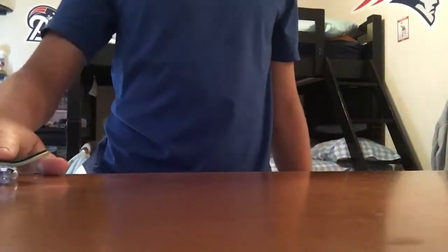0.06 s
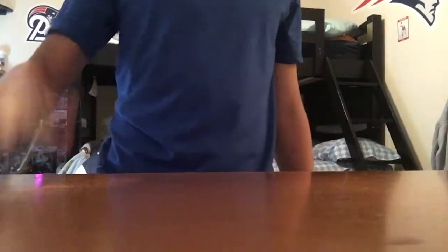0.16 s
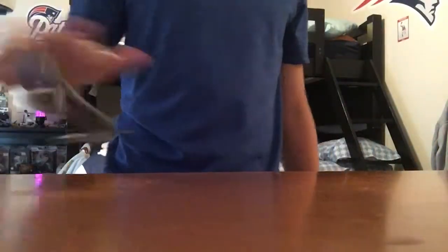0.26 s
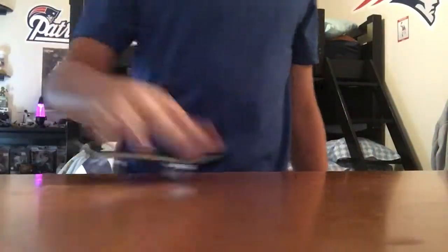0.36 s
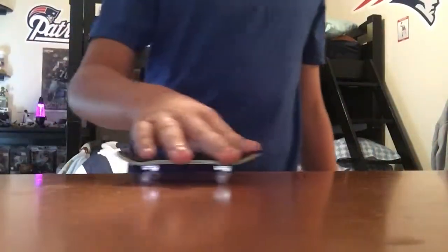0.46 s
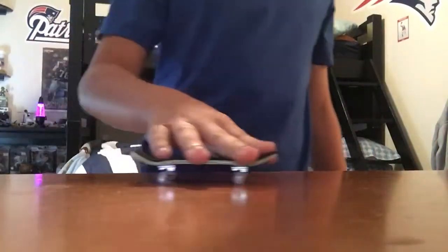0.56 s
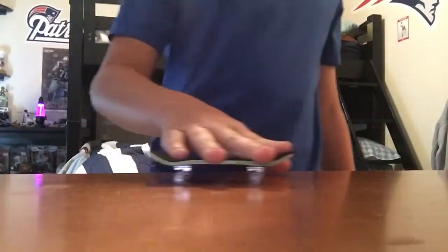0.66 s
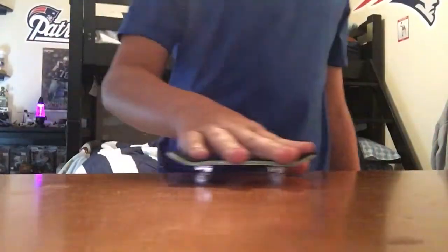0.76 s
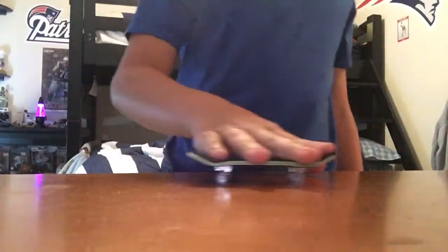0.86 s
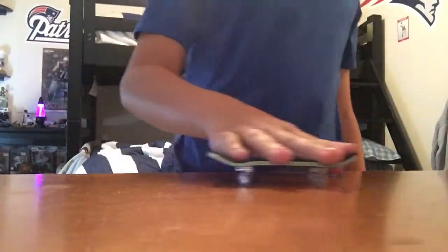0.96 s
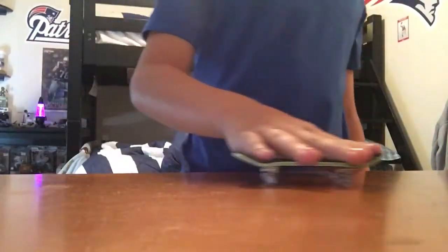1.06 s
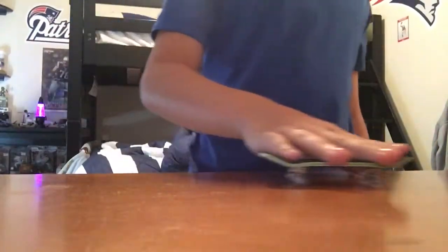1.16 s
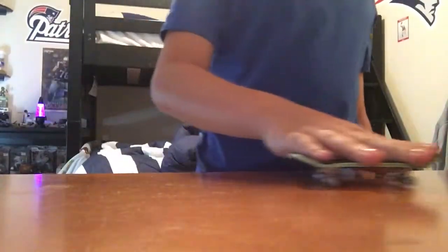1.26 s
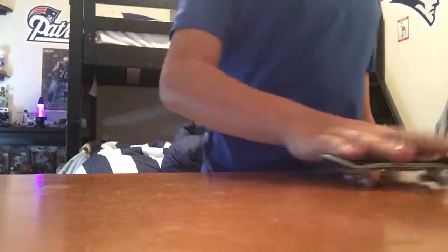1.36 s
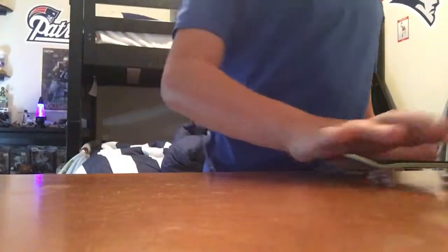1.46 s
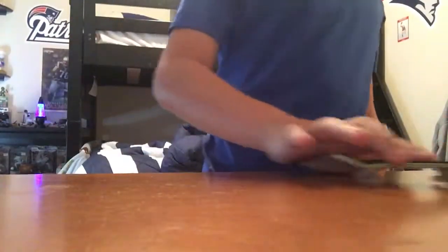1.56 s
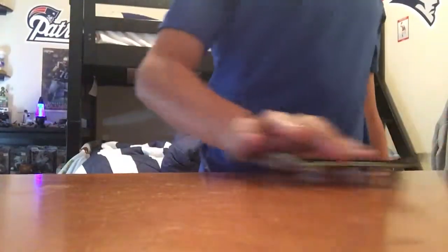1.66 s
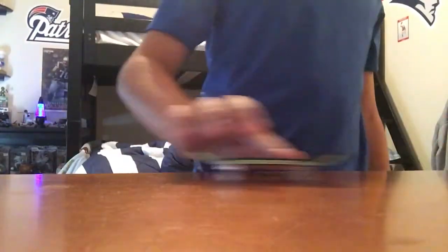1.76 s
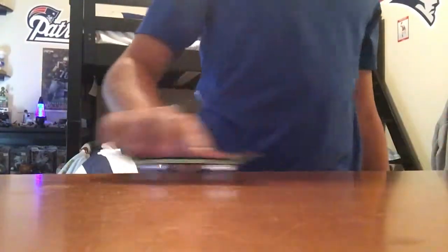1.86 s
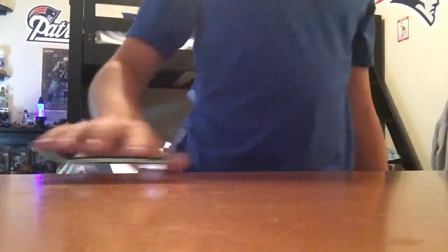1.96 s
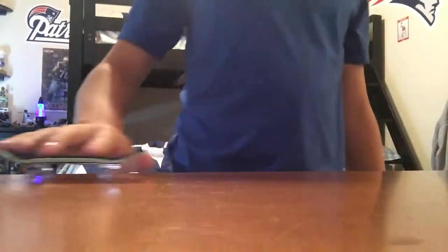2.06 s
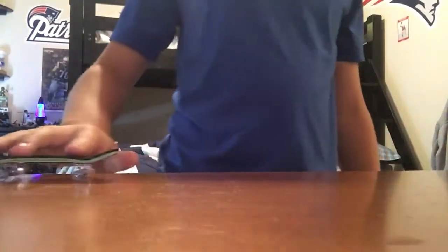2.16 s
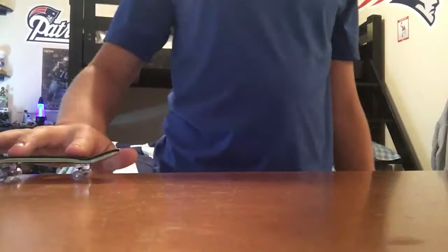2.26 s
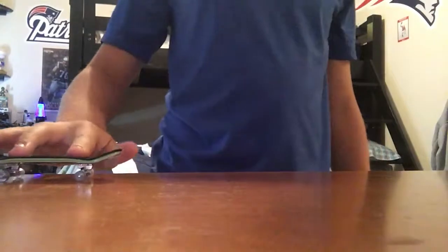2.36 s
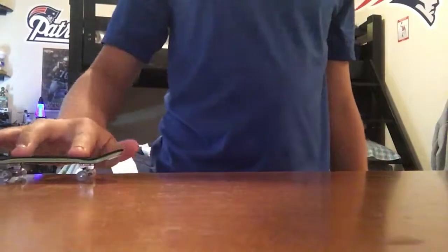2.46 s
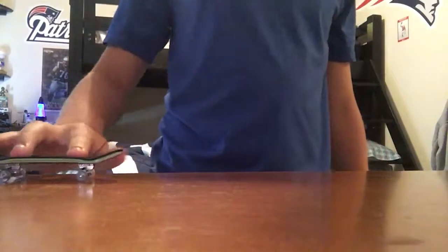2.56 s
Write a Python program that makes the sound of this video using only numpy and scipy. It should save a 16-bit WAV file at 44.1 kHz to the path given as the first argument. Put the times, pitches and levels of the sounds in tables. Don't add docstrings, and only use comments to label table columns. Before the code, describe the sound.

Tiny skateboard on a wood desk: brief scrape, hard snap, dense landing clacks, low gritty rolling, loose truck ticks, a rougher fast roll that judders and fades; heard very close in a small quiet room.

```python
import sys
import numpy as np
from scipy import signal
from scipy.io import wavfile
from scipy.ndimage import uniform_filter1d

SR = 44100
rng = np.random.default_rng(int(sys.argv[2]) if len(sys.argv) > 2 else 0)


def master(y):
    cut = np.clip(np.atleast_2d(y).T, -1, 1)
    pcm = np.round(cut * 32767)
    wavfile.write(sys.argv[1], SR, pcm.astype(np.int16))


def ratio(d):
    e = np.asarray(d, float) / 20
    return 10 ** e


N = 114660
SPREAD_DB = 2.5


def evened(x):
    return x / np.sqrt(np.mean(x ** 2) + 1e-20)


def read(points, hz):
    f, value = np.transpose(points)
    return np.interp(np.log(hz + 1), np.log(f + 1), value)


def coloured(x, points):
    half = read(points, np.fft.rfftfreq(4096, 1 / SR)) * np.log(10) / 20
    log_gain = np.r_[half, half[-2:0:-1]]
    impulse = np.fft.ifft(np.exp(np.conj(signal.hilbert(log_gain)))).real[:2048]
    return signal.oaconvolve(x, impulse)[:len(x)]


def ring(x, hz, width):
    r = np.exp(-np.pi * width / SR)
    return 2 * signal.lfilter([1 - r], [1, -r * np.exp(2j * np.pi * hz / SR)], x).real


def slow(size):
    noise = uniform_filter1d(rng.standard_normal(N), size=size)
    return 2 * np.tanh(evened(uniform_filter1d(noise, size=size)) / 2)


# pitch_hz, level_db
HUM = [(25, -23), (60, -2.5), (95, -3.5), (180, -4), (300, -11), (1000, -21), (3500, -26), (16000, -42)]


def room_hum():
    return ratio(-65) * evened(coloured(rng.standard_normal(N), HUM))


# pitch_hz, width_hz, level_db
DECK = [(714, 250, -5), (1324, 160, 2.5), (1600, 650, -3), (2470, 960, 5.5), (3300, 224, 4),
        (4450, 3000, -2.5), (5730, 2100, 1), (8100, 1400, -4), (12400, 6400, -40.5), (14500, 2500, -45.5)]
# pitch_hz, level_db, t60_s
DESK = [(91.8, -30, 0.33), (140.5, -9, 0.091), (195, -2.5, 0.044), (356, -16, 0.01), (504, -14, 0.041),
        (724, 0, 0.027), (1200, -3, 0.024)]
# pitch_hz, level_db
WALLS = [(150, -24.5), (400, -6.5), (1000, -7.5), (2000, -2.5), (3500, -0.5), (5500, -8), (8000, -13.5),
         (16000, -28.5)]


def deck_ring(rattle, focus_hz, luck):
    body = 0
    for k, ((hz, width, db), e) in enumerate(zip(DECK, luck)):
        body = body + ratio(db + SPREAD_DB * e) * ring(ring(rattle, hz, width), hz, width) * (-1) ** k
    focus = ring(ring(rattle, focus_hz, 550), focus_hz, 1100)
    crack = signal.lfilter(*signal.butter(2, 6000, "high", fs=SR), rattle)
    return evened(evened(body) + ratio(4) * evened(focus) + ratio(-17.5) * evened(crack))


def desk_thump(t, tilt_db, luck):
    modes = 0
    for (hz, db, t60), e in zip(DESK, luck):
        level = ratio(db + tilt_db * np.log2(hz / 400) - 60 * t / t60)
        modes = modes + level * np.sin(2 * np.pi * hz * (1 + 0.064 * e) * t)
    return modes * (1 - np.exp(-t / 0.0033))


def knocks(rows, tilt_db):
    out, t = np.zeros((2, N + 16384)), np.arange(16384) / SR
    for start_s, peak_db, focus_hz, thump_db, rattle_ms in rows:
        luck = rng.standard_normal(1024)
        u = t[:1024] * 1000 / max(rattle_ms, .2)
        contact = 1. * (u == 0)
        rattle = luck * abs(luck) * np.exp(-u ** 2) * np.minimum(u * 6, 1) + 3.2 * contact
        near = deck_ring(rattle, focus_hz, rng.standard_normal(len(DECK)))
        far = evened(coloured(contact, WALLS))
        thump = ratio(thump_db) * desk_thump(t, tilt_db, rng.standard_normal(len(DESK)))
        sound = np.tile(thump, (2, 1))
        sound[:, :1024] += np.array([near, far]) / abs(near).max()
        at = round(start_s * SR)
        out[:, at:at + 16384] += ratio(peak_db) * sound
    return out[:, :N]


# start_s, peak_db, pitch_hz (strongest ring), thump_db (desk)
TICKS = [(0.116, -55, 2240, -27), (1.0027, -44, 1120, 4), (1.367, -45, 9700, -16),
         (1.4197, -30.5, 1500, -24), (1.4450, -25, 2430, -10), (1.4544, -26.5, 3200, -0.5),
         (1.4894, -42, 3520, -14), (1.507, -46, 6000, -9), (1.5134, -60, 6000, -17), (1.5649, -25, 870, -7),
         (1.5768, -25.5, 3300, 0), (1.5853, -31, 3230, 0), (2.152, -34, 2380, -9), (2.338, -49.5, 2500, -8),
         (2.3436, -45.5, 2720, -21), (2.349, -48, 3300, -20), (2.3695, -50, 3300, -29),
         (2.376, -47, 1600, -15), (2.387, -53.5, 3000, -15), (2.4274, -58, 3400, 8),
         (2.5661, -44.5, 3300, -13), (1.4581, -27.5, 448, -3), (2.5668, -46, 1000, -20)]


def truck_ticks():
    rattle_ms = 3.8
    return knocks([(*row, rattle_ms) for row in TICKS], tilt_db=2)


# pitch_hz, t60_s
ROOM = [(100, 0.17), (260, 0.09), (700, 0.28), (2000, 0.16), (4500, 0.2), (9000, 0.11), (15000, 0.24)]


def room(x):
    hz, t, z = signal.stft(rng.standard_normal(SR // 2), SR, nperseg=256)
    tail = signal.istft(z * ratio(-60 * t / read(ROOM, hz)[:, None]), SR, nperseg=256)[1]
    tail = tail * np.clip(np.arange(len(tail)) / SR / 0.008, 0, 1)
    return signal.fftconvolve(x, tail / np.linalg.norm(tail))[:N]


# pitch_hz, level_db
WIDE = [(40, -27.5), (120, -1), (600, 3), (3500, -10.5), (6500, -13.5), (10000, -23), (14500, -21.5),
        (16500, -35)]


def roll(load, rings, bumps_per_s, size_db=3.0, judder_db=0.0, patchy_db=3.5, wide_db=-12, bright=.15, top_db=0):
    luck, t = rng.random((N, 3)).T, np.arange(N) / SR
    bumps = (luck[0] < bumps_per_s / SR) * np.sign(luck[1] - .5)
    bumps = bumps * ratio(-size_db * np.log(luck[2] + .03))
    bumps = bumps * ratio(judder_db * slow(size=130))
    rung = 0
    for k, (hz, width, db) in enumerate(rings):
        patches = ratio(db + patchy_db * slow(size=500))
        rung = rung + (-1) ** k * patches * ring(ring(bumps, hz, 1.5 * width), hz, 1.5 * width)
    s, db = np.transpose(load)
    level_db = np.interp(t, s, db)
    colour = [(f, d + top_db * (f > 8e3)) for f, d in WIDE]
    hiss_db = wide_db + bright * (level_db - db.max()) + judder_db * slow(size=120)
    hiss = ratio(hiss_db) * evened(coloured(bumps, colour))
    edges = np.clip((t - s[0]) / 0.0053, 0, 1) * np.clip((s[-1] - t) / 0.0027, 0, 1)
    return edges * ratio(level_db) * (evened(rung) + hiss)


# start_s, level_db
SCUFF = [(.172, -58), (.178, -51), (.188, -38), (.2, -58.5), (.213, -39), (.222, -30), (.230, -20.5),
         (.238, -26), (.249, -48.5)]
# pitch_hz, width_hz, level_db
SCUFF_RING = [(1190, 220, -2.5), (1610, 260, -1), (1000, 150, -10.5), (2140, 340, -8.5), (2920, 500, -11.5),
              (6100, 500, -30)]


def tail_scuff():
    return roll(SCUFF, SCUFF_RING, 2200, size_db=0.5, judder_db=0.5, patchy_db=0.5, wide_db=-8.5, bright=0.1)


# start_s, peak_db, pitch_hz (strongest ring), thump_db (desk), rattle_ms
CLACKS = [(.1865, -25, 3200, -35.5, 1.15), (.2350, -13, 2150, -14.5, 1.9), (.2497, 0, 3500, -12, .7),
          (.2512, -8, 5130, -9.5, 0.95), (.2530, -15, 1900, -7, 1.2), (.4002, 1, 2300, -19.5, 1.3),
          (.4010, -4, 4200, -12, 0.66), (.4030, -11.5, 2100, -15.5, 1.5), (.4142, -3.5, 2620, -23.5, 1.2),
          (.4162, 1.5, 4300, -10, 0.75), (.4178, -12, 3500, -17, 1.8), (.4248, -12, 3800, -11.5, .9),
          (.4260, -6.5, 6000, -14, 0.4), (.4335, -23.5, 3400, -16, 1.2), (.4370, -1, 3300, -9.5, 1.1),
          (.4392, 0.5, 3300, -4.5, 1.3), (.4405, -10, 2000, -5, 0.98), (.4538, -18, 3600, -11.5, 1.1),
          (.4558, -2, 3500, -10, 1.4), (.4585, -12.5, 1200, -6.5, 1.5), (.4755, -26, 3500, -10, 1.5),
          (.5040, -28, 3000, -37, 4.6), (.5093, -20, 2900, -5, 1.4), (.5380, -32, 3100, -36, 1.6),
          (.5425, -29.5, 2970, 0, 3)]


def hard_clacks():
    return knocks(CLACKS, tilt_db=0)


# start_s, level_db
SPIN = [(.26, -42), (.33, -50.5), (.40, -54)]
# pitch_hz, width_hz, level_db
SPIN_RING = [(4500, 310, 4.5), (6000, 900, -2.5), (2500, 1800, -4), (8900, 12000, -18)]


def wheel_spin():
    return roll(SPIN, SPIN_RING, 4000)


# start_s, level_db
SLOW = [(.55, -46.5), (.63, -56), (.81, -46), (.88, -50.5), (1.13, -45), (1.25, -46), (1.37, -40),
        (1.46, -46.5), (1.575, -52.5)]
# pitch_hz, width_hz, level_db
SLOW_RING = [(89, 43, 4.5), (178.5, 69, 5.5), (955, 144, 3), (1200, 527, 2), (2000, 370, -1),
             (2900, 1920, -10.5), (3750, 660, -7.5), (5750, 680, -19.5)]


def slow_roll():
    return roll(SLOW, SLOW_RING, 2000, size_db=1.85, judder_db=0.94, patchy_db=3.2, wide_db=-6,
                bright=0.31, top_db=-5)


# start_s, level_db
GRIP = [(.62, -71.5), (.74, -66), (.85, -62.5), (.87, -79)]
# pitch_hz, width_hz, level_db
GRIP_RING = [(3820, 3200, 0), (8900, 4000, -4.5), (13230, 4800, -8.5)]


def grip_rustle():
    return roll(GRIP, GRIP_RING, 4500)


def taps(rows, rings, decay_s):
    out, fade = np.zeros(N + 2048), np.exp(-np.arange(2048) / SR / decay_s)
    for start_s, peak_db in rows:
        luck = rng.standard_normal(2048)
        grains = np.r_[2, luck[1:]] * fade
        tap = 0
        for k, ((hz, width, db), e) in enumerate(zip(rings, luck[::-1])):
            tap = tap + (-1) ** k * ratio(db + SPREAD_DB * e) * ring(grains, hz, width)
        out[round(start_s * SR):][:2048] += ratio(peak_db) * tap / abs(tap).max()
    return out[:N]


# start_s, peak_db
GRIT = [(0.6517, -40), (0.7023, -42), (0.7243, -40), (0.7573, -36), (0.814, -52), (0.847, -48.5),
        (0.8804, -43), (0.917, -43), (0.929, -40), (0.9504, -50), (0.9697, -54), (0.9855, -51),
        (1.0104, -58), (1.0615, -38.5), (1.12, -42), (1.14, -38.5), (1.149, -39.5), (1.2014, -46.5),
        (1.2274, -46), (1.255, -37.5), (1.2764, -49), (1.3209, -49.5), (1.3444, -36)]
# pitch_hz, width_hz, level_db
GRIT_RING = [(1900, 500, 1), (3200, 570, 10.5), (5400, 2200, -4), (8920, 2000, -13.5), (13000, 2200, -17)]


def grit_cracks():
    return ratio(-1.5) * taps(GRIT, GRIT_RING, decay_s=.0006)


# start_s, level_db
TWIST = [(1.26, -60), (1.36, -49), (1.4, -47.5), (1.46, -45.5), (1.56, -57)]
# pitch_hz, width_hz, level_db
TWIST_RING = [(388, 210, 4.5), (607, 75, 10.5), (9530, 1700, -24), (14500, 2500, -29.5)]


def deck_twist():
    return roll(TWIST, TWIST_RING, 2000, wide_db=-22)


# start_s, level_db
FAST = [(1.57, -37.5), (1.6, -37), (1.635, -39), (1.68, -32.5), (1.76, -28.5), (1.87, -32), (2.02, -46)]
# pitch_hz, width_hz, level_db
FAST_RING = [(193, 196, -1), (473, 364, 4.5), (1130, 214, 1), (1500, 150, 5.5), (2120, 570, -8),
             (3100, 770, -5.5), (4200, 1100, -22.5), (6100, 500, -34)]


def fast_roll():
    return roll(FAST, FAST_RING, 3500, size_db=3.6, judder_db=1.2, patchy_db=3.4, wide_db=-6.5, bright=0.61)


# start_s, level_db
SWEEP = [(1.7, -60), (1.75, -36), (1.83, -34.5), (1.92, -38.5), (2.0, -56)]
# pitch_hz, width_hz, level_db
SWEEP_RING = [(386, 130, -2), (3070, 430, 5), (4300, 790, -6.5), (6100, 300, -11)]


def wheel_song():
    return roll(SWEEP, SWEEP_RING, 3500, wide_db=-12.5)


# start_s, level_db
BRAKE = [(1.85, -35), (1.96, -35.5), (2.06, -37), (2.14, -50.5), (2.24, -55)]
# pitch_hz, width_hz, level_db
BRAKE_RING = [(176, 160, 17.9), (644, 500, 22), (1640, 690, 9.1), (1900, 68, 24), (2230, 340, 8.7),
              (3100, 580, 20), (3544, 820, 14), (5950, 280, 12)]


def braking():
    return roll(BRAKE, BRAKE_RING, 3600, size_db=6.3, judder_db=2.6, patchy_db=0.58, wide_db=-4.5, bright=0.24)


# start_s, level_db
STOP = [(2.0, -49.5), (2.1, -42.5), (2.17, -41), (2.24, -59.5), (2.25, -55), (2.29, -53.5), (2.32, -68),
        (2.41, -62), (2.5, -85)]
# pitch_hz, width_hz, level_db
STOP_RING = [(193, 68, -2.5), (679, 150, 0.5), (1500, 260, -11), (2440, 300, -8.5), (3200, 550, -21)]


def creep_to_rest():
    return roll(STOP, STOP_RING, 2500, wide_db=-7.5)


# start_s, peak_db
CATCHES = [(2.2485, -46), (2.2535, -35), (2.2615, -35), (2.274, -39), (2.2852, -35), (2.311, -46),
           (2.396, -49), (2.409, -47)]
# pitch_hz, width_hz, level_db
CATCH_RING = [(705, 75, 10.5), (1500, 490, -3), (2300, 510, 0.5), (3300, 1420, -8.5)]


def wheel_catches():
    return taps(CATCHES, CATCH_RING, decay_s=.00004)


def scene():
    near, far = truck_ticks() + tail_scuff() + hard_clacks()
    wheels = wheel_spin() + slow_roll() + grip_rustle() + grit_cracks() + deck_twist()
    wheels = wheels + fast_roll() + wheel_song() + braking() + creep_to_rest() + wheel_catches()
    echo = room(ratio(-13.5) * far + ratio(-9.5) * wheels)
    return (near + wheels + echo + room_hum())[None]


def roll_off(x):
    return signal.sosfilt(signal.butter(12, 16640, fs=SR, output="sos"), x)


def record(dry):
    ceiling, low_cut_hz, top_edge_hz = .97, 64, 16300
    bass_cut = signal.butter(3, low_cut_hz, "high", fs=SR, output="sos")
    x = signal.sosfilt(bass_cut, dry) / ceiling
    overloaded = ceiling * x / (1 + x ** 4) ** (1 / 4)
    mix = signal.oaconvolve(overloaded, signal.firwin(255, top_edge_hz, fs=SR)[None], "same")
    return roll_off(mix)


dry = scene()
out = record(dry)
master(out)
```